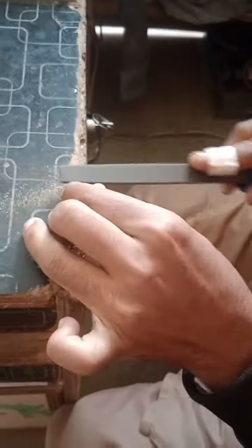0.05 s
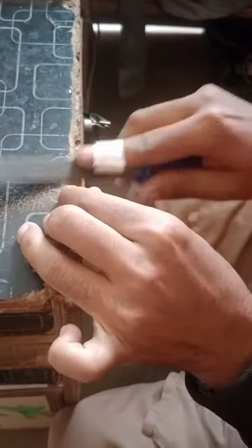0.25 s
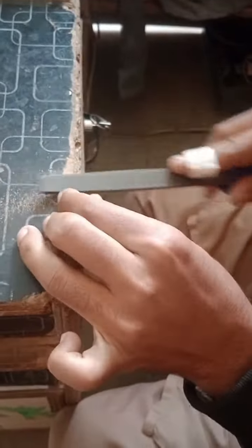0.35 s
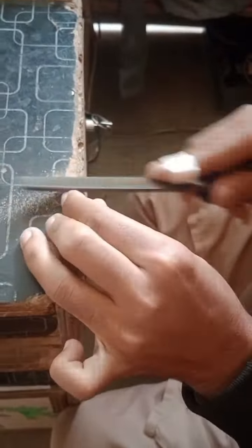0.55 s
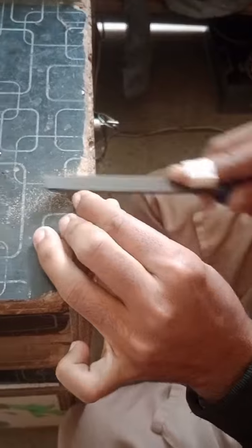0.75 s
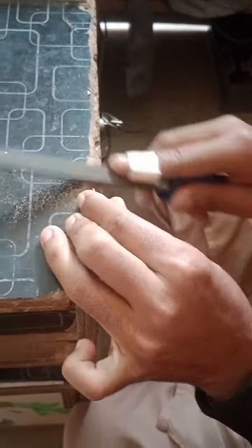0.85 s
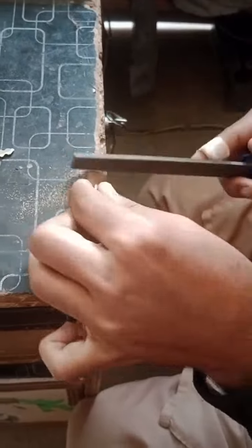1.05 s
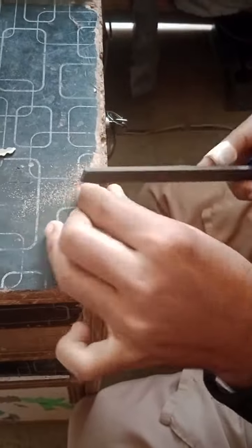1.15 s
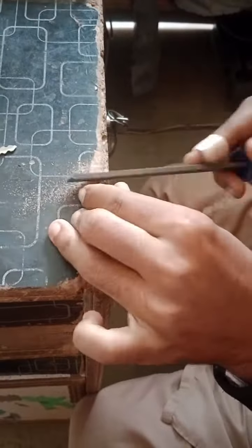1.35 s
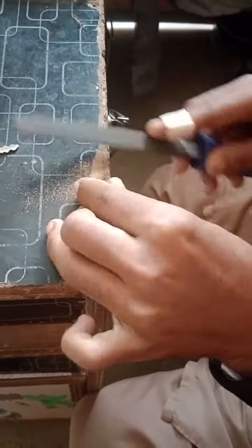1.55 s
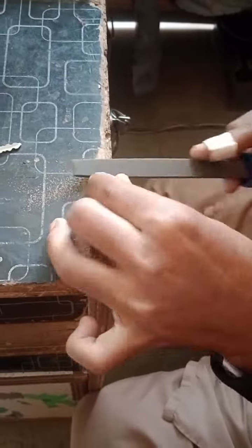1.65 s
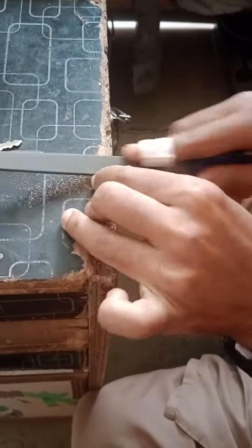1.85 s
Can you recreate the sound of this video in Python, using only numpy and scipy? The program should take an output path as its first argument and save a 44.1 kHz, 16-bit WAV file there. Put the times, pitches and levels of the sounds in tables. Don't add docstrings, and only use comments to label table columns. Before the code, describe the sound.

A metal file rasps a small metal part, heard close in a small room. A faint stroke tail opens, then gritty strokes with hollow bench shudder cluster at 0.2-0.35 s, 0.55 and 0.8, where a hard low thump lands. More scrapes run 0.95-1.25 with squeaks and ticks. A near-quiet lull follows, with a tiny dropout at 1.46, then lighter, brighter strokes at 1.6, 1.7 and 1.8.

```python
import sys
import numpy as np
from scipy import signal
from scipy.io import wavfile
from scipy.ndimage import uniform_filter1d

SR = 44100
rng = np.random.default_rng(int(sys.argv[2]) if len(sys.argv) > 2 else 0)


def store_pcm(level_fs):
    pcm = np.round(np.clip(level_fs, -1, 1) * 32767).astype(np.int16)
    wavfile.write(sys.argv[1], SR, np.atleast_2d(pcm).T)


def level_to_linear(level):
    exponent = np.asarray(level, float) / 20
    return 10 ** exponent


N = 83790
T = np.arange(N) / SR

# (peak [s], rise [s], fall [s], grit level [dB], bench level [dB])
STROKES = [(0.0, .03, 0.058, -55.5, -48.5), (0.217, 0.049, 0.022, -47.5, -37),
           (0.257, 0.065, 0.074, -43, -29), (0.33, 0.024, 0.032, -44, -36), (.47, 0.023, 0.013, -78, -57),
           (0.541, 0.052, 0.072, -42.5, -29.5), (.62, 0.011, 0.082, -63, -62),
           (0.693, 0.046, 0.1, -65, -45), (.8, 0.061, 0.047, -42, -30.5), (0.932, 0.014, 0.094, -73, -75),
           (0.988, 0.034, 0.061, -45, -34), (1.097, 0.062, 0.054, -51, -45.5),
           (1.177, 0.061, 0.039, -48, -33.5), (1.215, 0.085, 0.036, -54.5, -46),
           (1.593, 0.061, 0.059, -46.5, -36.5), (1.695, 0.034, 0.058, -48.5, -52),
           (1.783, 0.05, 0.045, -48, -41)]


def evened(x):
    return x / np.sqrt(np.mean(x ** 2) + 1e-20)


def add(mix, start_s, sound):
    part = mix[round(start_s * SR):][:len(sound)]
    part += sound[:len(part)]


def drift(size):
    once = uniform_filter1d(rng.standard_normal(N), size)
    return evened(uniform_filter1d(once, size))


def clicks(per_s, spread_db):
    when, sign, strength = rng.random((3, N))
    excess = np.minimum(-np.log(strength + 1e-9), 5)
    return (when < per_s / SR) * np.sign(sign - 0.5) * level_to_linear(spread_db * excess)


def resonate(x, hz, width_hz):
    radius = np.exp(-np.pi * width_hz / SR)
    pole = radius * np.exp(2j * np.pi * hz / SR)
    return 2 * signal.lfilter([1 - radius], [1, -pole], x).real


def body(x, modes, grip_db, count):
    out = 0
    for k, (hz, width_hz, db) in enumerate(modes):
        ring = x
        for _ in range(count):
            ring = resonate(ring, hz, width_hz)
        gain = level_to_linear(db + grip_db * drift(size=700))
        out = out + (-1) ** k * gain * ring
    return out


def pressure(column, spread):
    edge_db, roundness = -29, 2.01
    power = np.zeros(N)
    for row in STROKES:
        peak_s, rise_s, fall_s = row[:3]
        u = np.where(T < peak_s, (peak_s - T) / rise_s, (T - peak_s) / fall_s) / spread
        power += level_to_linear(row[column] + edge_db * u ** roundness) ** 2
    return np.sqrt(power)


def bumps(rows):
    return level_to_linear(sum(db * np.exp(-((T - s) / half_s) ** 2) for s, half_s, db in rows))


def thinned(x):
    low_hz, top_hz = 125, 4200
    return signal.lfilter(*signal.butter(2, [low_hz, top_hz], "band", fs=SR), x)


def file_grit():
    # (pitch [Hz], width [Hz], level [dB])
    file_modes = [(2670, 1600, -10.5), (3560, 170, -3), (3680, 860, -10.5), (5503, 400, -9),
                  (6500, 950, -3.5), (7340, 740, 1), (7996, 505, 4), (8610, 590, -1.5), (10300, 1270, -9.5),
                  (12570, 1300, -15), (13600, 600, -35), (15100, 1100, -18)]
    sheen_db = [0, -3, 0, 1, -5, 0, -6, -6, -2, -4, -1, 0, 1, 5, 3, 3, 3]
    # (time [s], half length [s], grit gain [dB])
    lifts = [(0.298, .009, -9), (0.601, .012, -6), (.645, .012, -4), (0.737, .014, -2), (1.058, 0.0068, -1),
             (1.134, .011, -5), (1.656, 0.013, -9), (1.73, .012, -1)]
    # (time [s], half length [s], grit gain [dB])
    bites = [(0.211, .006, 3.5), (0.24, 0.0087, 2), (0.329, 0.0067, 2.5), (0.761, 0.0073, 3.5),
             (0.806, 0.0072, 3), (0.965, 0.0091, 5.5), (1.016, 0.0089, 2.5), (1.07, .008, 2),
             (1.146, .008, 3.5), (1.187, 0.0055, 2.5), (1.6, 0.0069, 2.5), (1.672, 0.0074, 6.5),
             (1.705, 0.007, 2), (1.811, 0.0073, 1)]
    top_hz, top_growth, full_db = 9500, 0.11, -31
    grip_db, flutter_db = 1.8, 1.1

    teeth = clicks(per_s=12000, spread_db=2.5)
    press = pressure(column=3, spread=1)
    main = body(teeth, [m for m in file_modes if m[0] < top_hz], grip_db, count=2)
    top = body(teeth, [m for m in file_modes if m[0] > top_hz], grip_db, count=2)
    top *= level_to_linear(np.interp(T, [row[0] for row in STROKES], sheen_db))
    top *= (press / level_to_linear(full_db)) ** top_growth
    grit = evened(main + top) * level_to_linear(flutter_db * drift(size=120))
    return grit * press * bumps(lifts + bites)


def bench_shake():
    # (pitch [Hz], width [Hz], level [dB])
    bench_modes = [(206.5, 70, 0.5), (317.4, 47.4, 3), (435.5, 56.6, 3), (613, 119.5, 1), (780, 107, -1.5),
                   (1123, 206, -7), (1310, 77, -5.5), (1450, 72, -6.5), (1730, 150, -12.5),
                   (2123, 295, -15.5)]
    # (time [s], half length [s], bench gain [dB])
    grips = [(.13, .02, -5), (.2, .02, 2.5), (.241, .005, 4), (.38, .02, -6), (.62, .012, -5),
             (.972, .006, 5), (1.115, .015, -1.5), (1.155, .012, -4), (1.695, .02, -5)]
    catches = clicks(per_s=3000, spread_db=2.5)
    shake = evened(body(catches, bench_modes, grip_db=2.5, count=1))
    return thinned(shake) * bumps(grips) * pressure(column=4, spread=1.15)


def judders():
    # (start [s], length [s], pitch [Hz], level [dB])
    drones = [(0.038, 0.078, 432.6, -40.5), (0.026, 0.049, 692, -55), (0.166, 0.086, 483.5, -42.5),
              (.225, 0.044, 790.8, -32), (0.27, 0.047, 253.5, -35.5), (.32, 0.046, 168, -36.5),
              (0.315, 0.039, 1310, -40), (0.422, 0.062, 323, -45.5), (.475, 0.047, 526, -41),
              (0.575, .03, 236, -35.5), (0.601, 0.051, 329, -45), (.6, .025, 225, -41.5),
              (.655, 0.035, 505, -37), (.685, .04, 480, -36), (0.665, 0.062, 275, -41.5),
              (.73, .04, 310, -39.5), (0.775, 0.016, 792, -31.5), (0.864, 0.033, 459, -50.5),
              (1.01, 0.058, 318.6, -41.5), (1.033, 0.023, 623, -38.5), (1.192, 0.032, 140.6, -40.5),
              (1.234, 0.042, 355, -50.5), (1.4, 0.095, 449, -58.5), (1.25, 0.024, 630, -55),
              (1.285, .02, 280, -59), (1.34, 0.05, 546, -61), (1.355, 0.031, 313, -59),
              (1.399, 0.028, 698, -65), (.4, 0.059, 519, -56), (0.416, .035, 741, -59.5),
              (.16, 0.05, 758, -50), (0.873, 0.049, 334, -53.5), (0.962, 0.042, 350, -38),
              (0.516, 0.075, 438.8, -36), (1.516, 0.12, 725, -44.5), (1.601, 0.035, 461, -34.5),
              (1.702, 0.039, 226.6, -48), (1.763, 0.011, 598, -42.5), (1.79, 0.047, 543, -51)]
    wobble_share, sag_share, waver_db = 0.045, 0.045, 2.6
    out, wobble, waver = np.zeros(N), drift(size=150), drift(size=250)
    for start_s, length_s, hz, db in drones:
        u = np.arange(0, length_s, 1 / SR) / length_s
        i = np.minimum(round(start_s * SR) + np.arange(len(u)), N - 1)
        bend = (400 / hz) ** 2 * (wobble_share * wobble[i] + sag_share * (0.5 - u))
        turns = np.cumsum(hz * (1 + bend)) / SR
        level = level_to_linear(db + waver_db * 400 / hz * waver[i])
        swell = np.sqrt(2 * np.sin(np.pi * u))
        add(out, start_s, level * swell * np.sin(2 * np.pi * turns))
    return out


def squeals():
    # (start [s], length [s], pitch [Hz], level [dB])
    whistles = [(0.014, 0.11, 1314, -58), (0.203, 0.073, 3735, -50.5), (.225, 0.148, 1450, -47),
                (0.239, 0.048, 2140, -54), (0.226, .03, 790, -38), (0.338, 0.03, 2225, -52),
                (0.585, 0.024, 1950, -55), (0.607, 0.15, 2700, -67.5), (0.83, 0.026, 1930, -56),
                (0.69, 0.047, 1970, -54.5), (0.709, 0.13, 2400, -61), (0.914, 0.057, 1284, -65.5),
                (1.007, 0.011, 1334, -36), (1.061, 0.019, 2790, -51), (1.081, 0.031, 2940, -51),
                (1.067, 0.042, 3630, -63), (1.202, .045, 1850, -80), (1.207, 0.043, 3230, -64),
                (1.277, 0.068, 1040, -65.5), (1.525, 0.17, 1250, -50), (1.59, 0.033, 3220, -52),
                (1.662, 0.11, 1110, -52), (1.64, 0.16, 754, -53), (1.771, 0.039, 3270, -58),
                (1.757, 0.074, 1286, -48.5), (0.236, 0.014, 8020, -38), (.79, .022, 8100, -43),
                (1.062, .016, 12200, -66), (1.095, .018, 12500, -64), (1.062, 0.037, 3900, -61.5),
                (1.08, .025, 4800, -64), (.91, 0.037, 10400, -75), (.86, 0.034, 1900, -65.5),
                (1.67, 0.07, 1900, -60)]
    out = np.zeros(N)
    rub = np.tile(clicks(per_s=2500, spread_db=2.2), 2)
    for start_s, length_s, hz, db in whistles:
        u = np.arange(0, length_s, 1 / SR) / length_s
        width_hz = 79 + 0.037 * hz
        ring = rub[round(start_s * SR):][:SR // 5]
        for _ in range(2):
            ring = resonate(ring, hz, width_hz)
        ring = ring[::-1][:len(u)]
        swell = np.sin(np.pi * u ** 0.58) ** 1.22
        add(out, start_s, level_to_linear(db) * swell * evened(ring))
    return out


def thumps():
    # (time [s], pitch [Hz], level [dB], hold [s], t60 [s])
    thuds = [
        (.8146, 215, -18.5, .0135, .006),
        (.8291, 160, -18.5, .002, .018),
        (.8348, 228, -34, .011, .03),
        (1.4553, 270, -49, .012, .03),
    ]
    # (time [s], pitch [Hz], level [dB], hold [s], t60 [s])
    shoves = [(.205, 70.6, -51, 0.0062, 0.04), (0.514, 62, -45.5, 0.015, 0.038),
              (1.193, 93, -44, 0.0093, 0.044), (.04, 60, -60, .015, .05), (.085, 75, -56, .01, .04),
              (.325, 70, -61, 0.011, 0.034), (.695, 60, -54, 0.013, .04), (.75, 55, -59, .012, .04),
              (.965, 55, -52, 0.019, .05), (1.56, 55.3, -57, .015, .05), (1.78, 60, -62, .012, .04)]
    out, t = np.zeros(N), T[:6000]
    for start_s, hz, db, hold_s, t60_s in thuds + shoves:
        decay_db = -60 * np.maximum(t - hold_s, 0) / t60_s
        add(out, start_s, level_to_linear(db + decay_db) * np.sin(2 * np.pi * hz * t))
    return out


def touch_ticks():
    # (time [s], level [dB], t60 [s], top-mode gain [dB])
    touches = [
        (0.462, -66, 0.13, -5),
        (0.606, -67, .08, -1),
        (0.6556, -43.5, 0.036, -6),
        (.677, -50.5, 0.032, 6),
        (.704, -56.5, 0.12, 7),
        (0.915, -69, 0.34, -2),
        (1.099, -51.5, 0.045, 4),
        (1.67, -66.5, 0.066, 1),
        (1.77, -67, 0.034, -6),
    ]
    # (pitch [Hz], level [dB])
    tick_modes = [(2700, -7), (4450, -23), (7000, 2.5), (7700, 0), (8400, 2.5), (10500, -10.5),
                  (12500, -27)]
    rise_s, width_hz = 0.0012, 560
    out, t = np.zeros(N), T[:6000]
    for start_s, db, t60_s, top_db in touches:
        for hz, mode_db in tick_modes:
            detune, loss = rng.random(2)
            hz = hz * (0.967 + 0.064 * detune)
            ring = body(rng.standard_normal(N), [(hz, width_hz, 0)], 0, count=3)[-len(t):]
            level_db = db + mode_db - 4 * loss + top_db * (hz > 9000) - 60 * t / t60_s
            add(out, start_s, level_to_linear(level_db) * np.minimum(t / rise_s, 1) * evened(ring))
    return out


def room_murmur():
    # (pitch [Hz], level [dB per Hz])
    spectrum = [(30, -34), (150, 2), (300, -2.5), (520, 0.5), (750, -10), (1300, -20), (3000, -30),
                (5500, -46)]
    murmur_db, patchy_db = -59.5, 5.5
    frames, hz = N // 128 + 6, np.fft.rfftfreq(512, 1 / SR)
    real, imag, patches = rng.standard_normal((frames, 257, 3)).T
    patches = uniform_filter1d(patches, size=2, axis=0)
    patches = evened(uniform_filter1d(patches, size=14, axis=1))
    f, db = np.transpose(spectrum)
    shape_db = np.interp(np.log(hz + 1), np.log(f + 1), db, right=-90)[:, None]
    depth = np.clip(700 / (hz[:, None] + 1), 0.3, 1)
    bins = (real + 1j * imag) * level_to_linear(shape_db + patchy_db * patches * depth)
    low = signal.istft(bins, nperseg=512, noverlap=384)[1][:N]
    return level_to_linear(murmur_db) * evened(low)


def mic_hiss():
    hiss = body(rng.standard_normal(N), [(7760, 1400, 2), (10700, 2900, -28)], 0, count=3)
    return level_to_linear(-79 + 2.6 * drift(size=1500)) * evened(hiss)


def room_tail(near):
    level_db, t60_s, t = -19, 0.14, T[:8000]
    tail = rng.standard_normal(8000) * level_to_linear(-60 * t / t60_s) * (t > 0.004)
    return level_to_linear(level_db) * signal.oaconvolve(near, tail / np.linalg.norm(tail))[:N]


def scene():
    near = file_grit() + bench_shake() + thinned(judders()) + squeals() + thumps() + touch_ticks()
    return (near + room_tail(near) + room_murmur() + mic_hiss())[None]


def band_limit(x):
    return signal.sosfilt(signal.butter(12, 15670, fs=SR, output="sos"), x)


def record(dry):
    notch_hz, notch_width_hz, edge_hz = 4845, 700, 15640
    x = signal.lfilter(*signal.iirnotch(notch_hz, notch_hz / notch_width_hz, SR), dry)
    lowpass = signal.firwin(511, edge_hz, window=("kaiser", 9), fs=SR)
    x = signal.oaconvolve(x, lowpass[None], "same")
    x = x * (1 - 0.96 * ((T > 1.458) & (T < 1.4657)))
    return band_limit(x)


dry = scene()
out = record(dry)
store_pcm(out)
```